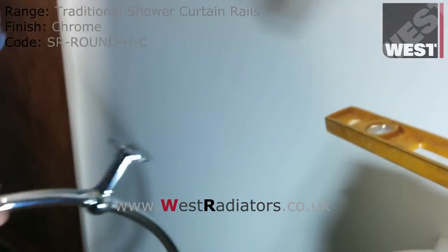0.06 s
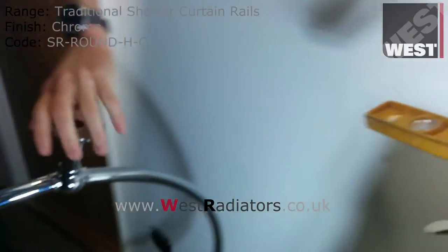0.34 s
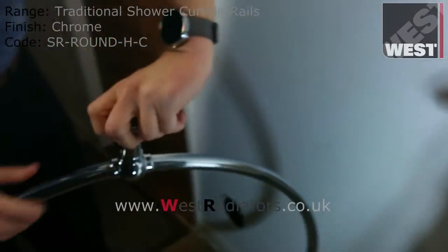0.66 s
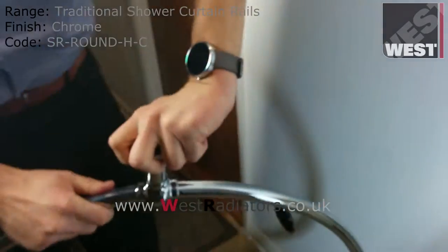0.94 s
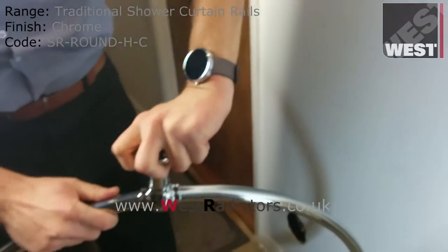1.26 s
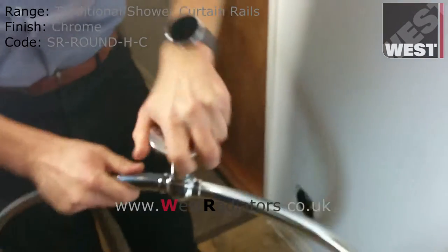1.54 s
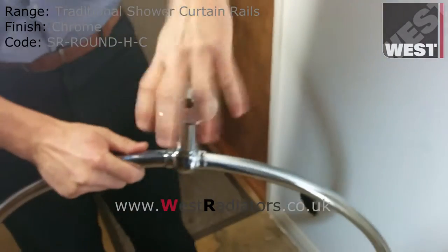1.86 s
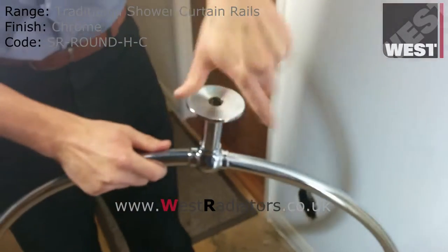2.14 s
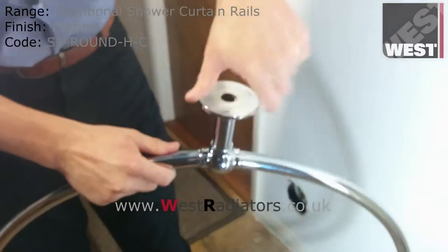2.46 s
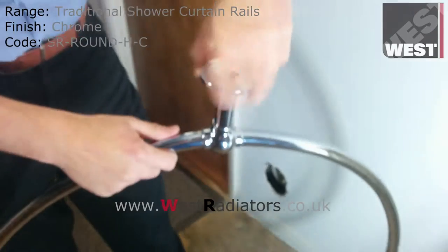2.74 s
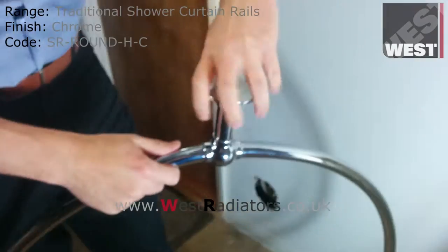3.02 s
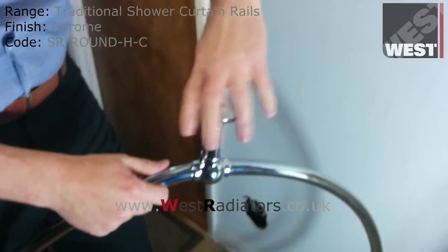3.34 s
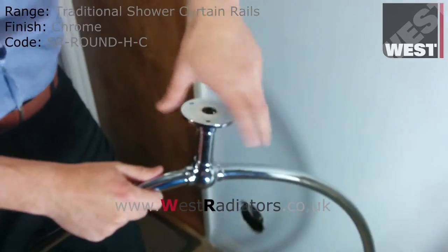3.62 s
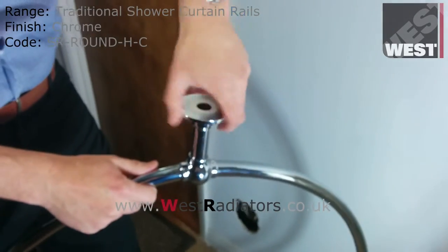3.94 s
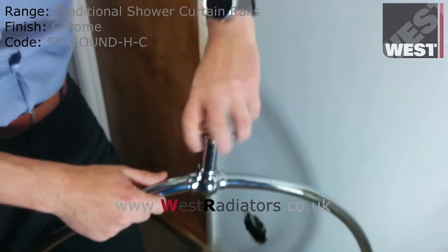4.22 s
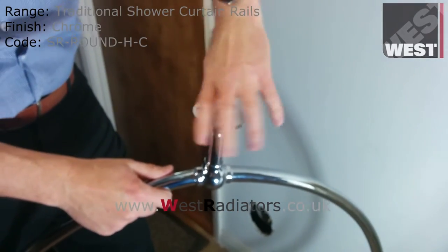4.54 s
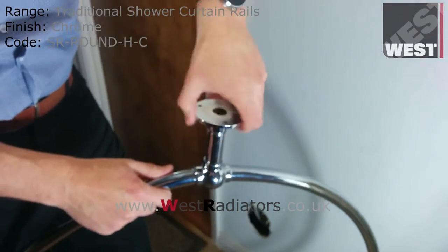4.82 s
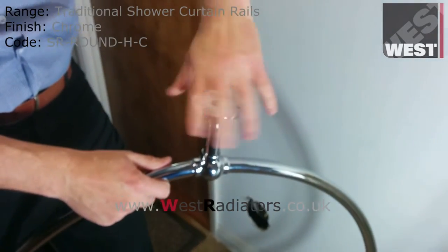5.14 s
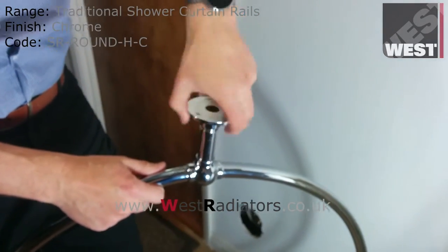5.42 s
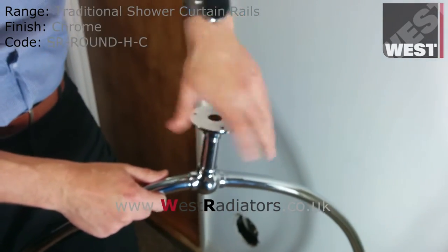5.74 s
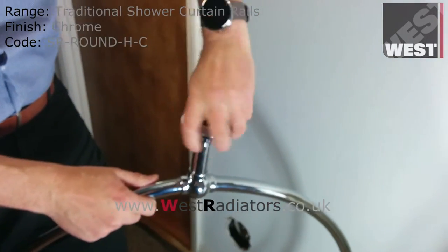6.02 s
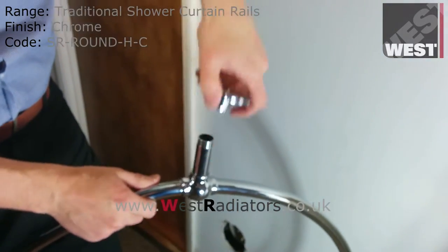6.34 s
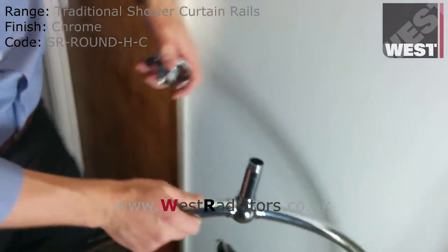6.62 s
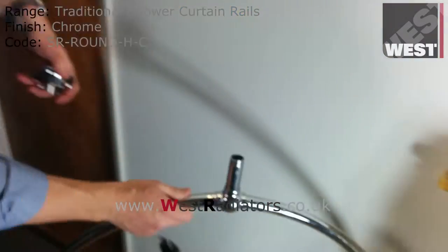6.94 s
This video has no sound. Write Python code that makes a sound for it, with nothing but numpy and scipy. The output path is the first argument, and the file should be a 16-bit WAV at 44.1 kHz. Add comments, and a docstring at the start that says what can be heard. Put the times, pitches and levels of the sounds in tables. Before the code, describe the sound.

A chrome plate is unscrewed by hand from the stem of a curtain rail, heard close in a small bathroom with a short echo and faint room tone. For the first second and a half, fingers rub over the metal, the rail bumps softly and a sleeve rustles faintly, with sharp little clicks around 1 and 1.2 seconds. At about 1.7 seconds the tight thread breaks free with a loud, brief, high squeal that rings on slightly. From 2 to 6 seconds come uneven turns of gritty, ringing metal scraping, with short squeaks and small hollow clunks. The strongest scrape and squeak falls near 2.9 seconds, and another bright catch with a click near 4.8. The turns then grow sparser and softer. At about 6.3 seconds the plate comes off with a light ping, followed by a soft, dull bump near 6.8 seconds.

```python
"""A chrome wall plate is unscrewed by hand from the stem of a curtain rail in a small bathroom.
The tight thread breaks free with a stick-slip squeal whose overtones linger. Each turn then scrapes,
clunks and squeaks, and the plate pings as it comes off. Fingers rub and click, the rail bumps softly,
a sleeve rustles over faint room tone. A noise suppressor cuts the room's tail short."""
import sys
import numpy as np
from scipy import signal
from scipy.fft import rfft, irfft, next_fast_len
from scipy.io import wavfile
from scipy.ndimage import uniform_filter1d, minimum_filter1d, map_coordinates

SR = 44100
rng = np.random.default_rng(int(sys.argv[2]) if len(sys.argv) > 2 else 0)


def inscribe(sig):
    """Save sig as 16-bit PCM at rate SR to the path in sys.argv[1].

    A 1-D sig is mono; a 2-D sig holds one channel per row.
    Samples are clipped to [-1, 1] before scaling.
    """
    pcm = np.round(np.clip(np.atleast_2d(sig).T, -1, 1) * 32767)
    wavfile.write(sys.argv[1], SR, pcm.astype(np.int16))


N = 311787
T = np.arange(N) / SR


def amp(db):
    """Decibels to gain."""
    return 10 ** (np.asarray(db) / 20)

def unit(x):
    """Scale to rms 1."""
    return x / np.sqrt(np.mean(x ** 2) + 1e-20)

def along(points, hz):
    """Interpolate (Hz, value) points on a log frequency axis."""
    knots_hz, values = np.transpose(points)
    return np.interp(np.log(hz + 1), np.log(knots_hz + 1), values)

def wobble(rate_hz):
    """Smooth random curve, rate_hz knots a second."""
    return map_coordinates(rng.standard_normal(int(N * rate_hz / SR) + 4), [T * rate_hz])

def filtered(x, response):
    """Apply a complex frequency response."""
    size = next_fast_len(N + SR // 2)
    return irfft(rfft(x, size) * response(np.fft.rfftfreq(size, 1 / SR)), size)[..., :N]

def coloured(x, spectrum):
    """Shape x by (Hz, dB) points, at rms 1."""
    return unit(filtered(x, lambda hz: amp(along(spectrum, hz))))

def noise(spectrum):
    """Coloured noise at rms 1."""
    return coloured(rng.standard_normal(N), spectrum)

def shifting(x, depth_db):
    """Favour different frequencies from moment to moment."""
    bins = signal.stft(x, nperseg=512)[2]
    field = uniform_filter1d(rng.standard_normal(bins.shape), size=3, axis=0)
    field = uniform_filter1d(field, size=7, axis=1)
    return signal.istft(bins * amp(depth_db * unit(field)), nperseg=512)[1][:N]

def strokes(rows, rise_s, t60_s):
    """Envelope of (start s, length s, dB) rows: each swells, holds and dies away."""
    lead = SR // 20
    t = np.arange(-lead, SR // 2) / SR
    power = np.zeros(N + SR)
    for start_s, length_s, db in rows:
        shape = (1 + np.tanh(t / rise_s)) / 2 * amp(db - 60 * np.maximum(t - length_s, 0) / t60_s)
        power[max(round(start_s * SR), 0):][:len(t)] += shape ** 2
    return np.sqrt(power[lead:][:N])

def resonances(rows, hz):
    """Summed response of (centre Hz, width Hz, dB) resonators."""
    return sum(amp(db) * 1j * hz * width / (centre ** 2 - hz ** 2 + 1j * hz * width)
               for centre, width, db in rows)

def ringing(rows, start_s, swell_s):
    """Sines of (Hz, dB, T60 s) rows that swell and decay."""
    t = np.maximum(T - start_s, 0)
    ring = sum(amp(db - 60 * t / t60_s) * np.sin(2 * np.pi * (hz * t + rng.random()))
               for hz, db, t60_s in rows)
    return (1 - np.exp(-t / swell_s)) * ring


# Room tone spectrum. Each row: frequency in Hz, relative level in dB.
ROOM_TONE_SPECTRUM = [(25, -12.5), (50, -7), (100, -14.5), (210, 0), (400, -0.5), (850, 4), (1300, -5),
                      (2500, -9), (5000, -15), (17000, -22.5)]

def room_tone(tone_db=-65, hum_hz=66.4, hum_db=-80):
    """Faint room noise and a wavering low hum."""
    hum = amp(3.2 * wobble(5.9)) * unit(np.sin(2 * np.pi * hum_hz * T + .4 * wobble(4.6)))
    air = unit(shifting(noise(ROOM_TONE_SPECTRUM), depth_db=3))
    return amp(tone_db) * air + amp(hum_db) * hum


# Wall reverberation. Each row: frequency in Hz, T60 in seconds.
ROOM_DECAY = [(150, 0.37), (600, 0.25), (2500, 0.28), (7000, 0.26), (14000, .26)]

def bathroom(x, wet_db, side_db=-21):
    """Hard walls add a short, nearly mono tail."""
    hz, t, bins = signal.stft(rng.standard_normal((2, SR // 2)), SR, nperseg=256)
    decay = amp(-60 * t / along(ROOM_DECAY, hz)[:, None])
    build_up = 1 - np.exp(-t / .004)
    tail = signal.istft(bins * decay * build_up, SR, nperseg=256)[1]
    tail /= np.linalg.norm(tail[0])
    mid, side = amp(wet_db) * signal.fftconvolve(x[None], tail, axes=1)[:, :N]
    return x + mid + amp(side_db) * np.array([side, -side])


# Rustle envelope. Each row: time in seconds, relative level in dB.
SLEEVE_LEVELS = [(0.0, -54.5), (0.196, -97), (0.436, -80), (0.638, -70), (0.91, -77.5), (1.02, -76),
                 (1.162, -67.5), (1.388, -80), (1.598, -63), (1.65, -51.5)]
# Cloth spectrum. Each row: frequency in Hz, relative level in dB.
CLOTH_SPECTRUM = [(1200, -20), (1800, -11), (2250, -10.5), (2550, 2), (2900, -11), (4200, -20),
                  (8200, -6.5), (12000, -14), (17000, -24.5)]

def sleeve(gain_db=7):
    """Cloth rustles while the hand takes hold."""
    level_db = np.interp(T, *np.transpose(SLEEVE_LEVELS), right=-120)
    return amp(level_db + gain_db) * noise(CLOTH_SPECTRUM)


# Rail knocks. Each row: start in seconds, relative level in dB.
RAIL_BUMPS = [(0.077, -62), (0.409, -45.5), (1.673, -49), (4.346, -60), (6.844, -45.5)]
# Knock spectrum. Each row: frequency in Hz, relative level in dB.
THUD_SPECTRUM = [(40, -14), (100, -10), (160, 0), (215, -3), (340, -5), (560, -18.5), (900, -22),
                 (2000, -44)]

def bumps():
    """Dull knocks of the hand-held rail."""
    level = strokes([(s, 0, db) for s, db in RAIL_BUMPS], rise_s=.0027, t60_s=.17)
    return level * noise(THUD_SPECTRUM)


# Finger slides. Each row: start in seconds, length in seconds, relative level in dB.
FINGER_SLIDES = [(.532, 0.026, -47), (.978, 0.03, -44.5), (1.198, 0.087, -48.5), (1.29, .13, -56),
                 (1.565, .07, -63.5), (1.653, .015, -43.5)]
# Spectra of skin on the face and on the rim. Each row: frequency in Hz, relative level in dB.
SKIN_SPECTRUM = [(200, -14), (800, -3.5), (2200, 3), (4200, -7.5), (8500, -1), (12000, -8), (16000, -13)]
RIM_SPECTRUM = [(1200, -25), (1800, -1), (2200, -16), (2560, 3), (3000, -21), (6000, -35)]

def fingers(drag_start_s=.77, drag_length_s=.26, drag_db=-62.5, grain_db=2):
    """Skin rubs over chrome and drags along the rim; the hand damps the metal."""
    slide = strokes(FINGER_SLIDES, rise_s=.008, t60_s=.082) * noise(SKIN_SPECTRUM)
    drag = strokes([(drag_start_s, drag_length_s, drag_db)], rise_s=.015, t60_s=.15)
    drag *= noise(RIM_SPECTRUM)
    return unit(amp(grain_db * wobble(200))) * (slide + drag)


# Clicks. Each row: start in seconds, relative level in dB, body offset in dB.
CLICK_HITS = [(0.513, -53.5, 16), (.997, -17, -16), (1.214, -27.5, -3.5), (1.241, -16.5, -6.5),
              (1.554, -32, -38), (4.876, -22.5, -4.5), (6.939, -59.5, 14.5), (6.988, -63.5, 14.5)]
# Spectra of a click's edge and body. Each row: frequency in Hz, relative level in dB.
EDGE_SPECTRUM = [(300, -22.5), (3000, -15.5), (6000, -1), (8500, 2), (12000, -6), (16000, -5)]
BODY_SPECTRUM = [(150, -34), (600, -6), (1200, -2.5), (2200, 1.5), (3500, -2), (7000, -26.5)]

def clicks(edge_db=-4, body_db=-5):
    """The grip and the loose thread tick: a bright edge, then a duller body."""
    edge = strokes([(s, 0, db + edge_db) for s, db, _ in CLICK_HITS], rise_s=.0005, t60_s=.017)
    body_rows = [(s, 0, db + offset_db + body_db) for s, db, offset_db in CLICK_HITS]
    body = strokes(body_rows, rise_s=.0011, t60_s=.089)
    return edge * noise(EDGE_SPECTRUM) + body * noise(BODY_SPECTRUM)


# Ping partials. Each row: frequency in Hz, relative level in dB, T60 in seconds.
PING_PARTIALS = [(2360, -41, .23), (6370, -56, .33)]

def ping():
    """Off the stem, the plate rings briefly on its own."""
    return ringing(PING_PARTIALS, start_s=6.288, swell_s=.004)


# Resonances of stem and rail, and of the tight plate-stem joint.
# Each row: centre in Hz, width in Hz, gain in dB.
RAIL_MODES = [(577.7, 38, 11.5), (860.7, 20, 4.5), (1116, 30.3, 7.5), (1328, 20, 3), (1475, 35, 6),
              (1563, 12, 14.5), (1827, 6.7, 5.5), (1853, 93, 5), (2050, 37, 1), (2203, 16, 10),
              (2310.5, 31, 10.5), (2653, 15, 5.5), (2976, 17, 11), (3610, 16, 6.5), (3773, 12, 8.5),
              (3998, 28, 17.5), (4436, 36, 15.5), (5002, 26, 10.5), (5504, 130, 8), (6330, 40, 7),
              (6820, 20, 5), (6890, 35, -5), (8500, 25, 8.5), (8770, 62, 11), (9600, 75, 3.5),
              (9826, 59, 6.5), (11730, 38, 12.5)]
JOINT_MODES = [(2905, 6, 16), (2955, 7, 13)]

def rail(x, loose_s=5, fade_s=.25):
    """Friction rings stem and rail; the joint's ring ends as the plate works loose."""
    tight = (1 - np.tanh((T - loose_s) / fade_s)) / 2
    joint = filtered(tight * x, lambda hz: resonances(JOINT_MODES, hz))
    return filtered(x, lambda hz: 1 + resonances(RAIL_MODES, hz)) + joint


# Hand turns, and catches where the thread jerks on.
# Each row: start in seconds, length in seconds, relative level in dB, treble offset in dB.
HAND_TURNS = [(1.836, 0.082, -30, -23.5), (2.158, 0.22, -38, -46), (2.335, 0.43, -32, -34.5),
              (2.874, 0.44, -33.5, -24.5), (3.495, 0.284, -32, -26), (3.85, 0.043, -44, -22.5),
              (3.965, .14, -37, -44), (4.411, 0.089, -45.5, -50.5), (4.735, 0.23, -36, -40),
              (5.884, 0.1, -41.5, -47.5), (6.18, 0.15, -42, -55)]
THREAD_CATCHES = [(2.16, 0.029, -28.5, -49.5), (2.285, .06, -35, -54), (2.36, 0.016, -30, -1.5),
                  (2.412, .01, -24, -22), (2.468, .03, -33, -22), (2.508, .035, -19.5, -8.5),
                  (2.687, 0.043, -28.5, -24), (2.906, 0.044, -11.5, 1.5), (3.175, 0.024, -19.5, -6.5),
                  (3.532, 0.027, -33, -6.5), (3.632, 0.031, -23, -17.5), (3.709, 0.023, -28.5, -4.5),
                  (4.034, 0.022, -22, -32), (4.462, 0.027, -32.5, -54), (4.735, 0.03, -25, -25.5),
                  (4.831, 0.012, -27.5, 6.5), (4.864, .028, -24, -28), (5.072, 0.0072, -38, -51.5),
                  (5.205, 0.012, -49, -39.5), (5.47, .026, -27, -35.5), (5.595, 0.0089, -40, -33),
                  (5.884, 0.0057, -28, -48), (5.927, 0.053, -33, -33), (6.128, .015, -43, -44),
                  (6.284, 0.019, -26, -35.5)]

def effort(pressure, treble_share):
    """Friction envelope of turns and catches, for a band taking a share of the treble offset."""
    turns, catches = ([(s, length_s, db + treble_share * treble_db) for s, length_s, db, treble_db in rows]
                      for rows in (HAND_TURNS, THREAD_CATCHES))
    turning = pressure * strokes(turns, rise_s=.0039, t60_s=.0549)
    return np.hypot(turning, strokes(catches, rise_s=.004, t60_s=.053))


# Hollow clunk spectrum. Each row: frequency in Hz, relative level in dB.
CLUNK_SPECTRUM = [(150, -18), (330, -5.5), (570, -0.5), (850, 10.5), (1150, -6), (2000, -37.5)]

def clunks(play_db=-39.5, play_db_per_s=4.5):
    """Growing play in the thread lets the plate knock against the stem at each catch."""
    knocks = [(s, length_s, db + play_db + play_db_per_s * s) for s, length_s, db, _ in THREAD_CATCHES]
    return strokes(knocks, rise_s=.0041, t60_s=.14) * noise(CLUNK_SPECTRUM)


# Friction bands, low to high. Each row: frequency in Hz, relative level in dB.
GRIND_SPECTRUM = [(100, -51.5), (300, -22), (550, -23), (850, -7), (1250, -2.5), (1600, 2), (2200, 3),
                  (2700, 1), (3200, -9), (4000, -39), (6000, -72.5)]
RASP_SPECTRUM = [(2000, -44), (3300, 4.5), (4100, 1.5), (5000, 1.5), (5900, -19.5), (7200, -7.5),
                 (10000, -65)]
SIZZLE_SPECTRUM = [(4000, -55), (5900, -9), (6900, 3.5), (8400, -9.5), (9700, -4.5), (11000, -12),
                   (13500, -20), (15500, -28)]

def scrapes(slips_per_s=1500, spread_db=4, grit=.84, judder_db=2, pressure_db=2.2, rasp_db=-3):
    """Tiny slips in the thread; the drier the contact, the more rasp and sizzle."""
    slips = (rng.random(N) < slips_per_s / SR) * amp(spread_db * rng.standard_normal(N))
    drive = shifting(unit(slips) + grit * rng.standard_normal(N), depth_db=3.6)  # contact point wanders
    judder = unit(amp(judder_db * (wobble(160) + wobble(55))))  # thread catches and lets go
    pressure = amp(pressure_db * wobble(28))  # the hand wavers
    grind = coloured(drive, GRIND_SPECTRUM) * effort(pressure, treble_share=0)
    rasp = coloured(drive, RASP_SPECTRUM) * effort(pressure, treble_share=.43)
    sizzle = coloured(drive, SIZZLE_SPECTRUM) * effort(pressure, treble_share=1)
    return judder * (grind + amp(rasp_db) * rasp + sizzle)


# Squeaks. Each row: start in seconds, length in seconds, pitch in Hz, relative level in dB.
THREAD_SQUEAKS = [(2.155, .014, 2004, -31.5), (2.91, .017, 1770, -14), (3.164, 0.03557, 1714, -25),
                  (3.489, .05, 1466, -30), (3.54, .035, 1650, -25), (3.651, 0.00923, 2165, -16.5),
                  (3.719, 0.037, 1580, -25.5), (3.855, .042, 1626, -36), (3.973, .039, 1700, -30.5),
                  (4.051, .009, 2080, -25), (4.202, 0.00728, 2164, -40), (4.41, 0.0098, 1860, -29),
                  (4.496, 0.041, 1800, -38.5), (4.833, 0.0166, 1799, -18), (4.871, 0.02433, 1575, -26.5),
                  (6.191, 0.094, 1788, -42)]
# How well the plate radiates a squeak. Each row: frequency in Hz, relative gain in dB.
PLATE_RADIATION = [(2400, 5.5), (3400, -8), (4600, 2.5), (5100, -15.5), (5900, -25.5)]

def squeaks(second_db=-21, third_db=-14, flutter_db=3.5, jitter=.07, wander=.03):
    """Slips lock briefly into a rough pitch; back-and-forth chatter favours the third partial."""
    knots = sorted((t, hz) for s, length_s, hz, _ in THREAD_SQUEAKS for t in (s, s + length_s))
    pitch_hz = np.interp(T, *np.transpose(knots)) * (1 + jitter * wobble(700) + wander * wobble(50))
    phase = 2 * np.pi * np.cumsum(pitch_hz) / SR
    tone = np.sin(phase) + amp(second_db) * np.sin(2 * phase) + amp(third_db) * np.sin(3 * phase)
    rows = [(s, length_s, db) for s, length_s, _, db in THREAD_SQUEAKS]
    level = strokes(rows, rise_s=.0082, t60_s=.024)
    return level * coloured(amp(flutter_db * wobble(300)) * tone, PLATE_RADIATION)


# Squeal overtones, clustered near multiples of 2.4 kHz.
# Each row: frequency in Hz, relative level in dB, T60 in seconds.
SQUEAL_RING = [(2250, -8.5, 0.11), (2230, -7.5, 0.35), (2425, 0, 0.14), (3050, -20.5, 0.73),
               (4325, -9.5, 0.18), (4780, -1, 0.2), (5200, -22.5, .42), (5060, -6, .19), (7000, -6.5, 0.16),
               (7690, 2.5, 0.22), (7278, -13.5, 0.5), (7350, 5.5, 0.22), (9440, -7, 0.28), (9500, -4, 0.11),
               (11700, -17, .3), (11800, -17.5, .2), (13900, -15.5, .18), (14680, -14, .24)]

def squeal_ring():
    """The mounted plate rings on briefly at the squeal's overtones."""
    return ringing(SQUEAL_RING, start_s=1.667, swell_s=.0046)


# Squeal partials. Each row: harmonic number, relative level in dB.
SQUEAL_PARTIALS = [(1, 2.5), (2, -4), (3, 0), (4, -3.5), (5, -11), (6, -18.5)]
# Friction noise under the squeal. Each row: frequency in Hz, relative level in dB.
CHAFE_SPECTRUM = [(300, -29), (1600, -22.5), (2200, -4), (2850, 0.5), (3200, -11), (3700, -21)]

def squeal(start_s=1.674, hold_s=.0096, t60_s=.135, level_db=-4, chafe_db=-24,
           onset_hz=2444, sag_hz_per_s=1500, jitter=.011, flutter_db=2):
    """The tight thread breaks free in fast stick-slip; the pitch sags as the strain lets go."""
    pitch_hz = onset_hz - sag_hz_per_s * np.clip(T - start_s, -t60_s, t60_s)
    phase = 2 * np.pi * np.cumsum(pitch_hz * (1 + jitter * wobble(700))) / SR
    partials = sum(amp(db) * np.sin(k * phase) for k, db in SQUEAL_PARTIALS)
    tone = unit(amp(flutter_db * wobble(700)) * partials)
    level = strokes([(start_s, hold_s, level_db)], rise_s=.006, t60_s=t60_s)
    return level * (tone + amp(chafe_db) * noise(CHAFE_SPECTRUM))


def scene():
    """Thread and plate slightly to the right; handling and background centred."""
    friction = amp(-11) * rail(scrapes() + clunks()) + amp(-2) * squeaks()
    thread = bathroom(friction, wet_db=-5)
    breakaway = bathroom(squeal(), wet_db=1) + amp(-13.5) * squeal_ring()
    handling = bathroom(clicks() + fingers() + amp(3) * bumps(), wet_db=-12.5)
    pan = amp([[-.45], [.45]])
    return pan * (thread + breakaway + ping()) + handling + sleeve() + room_tone()

def suppressor(x, threshold_db=-45, knee_db=6, depth_db=8, bass_hz=260):
    """Turn down all but the bass when the level sinks below the threshold."""
    power = np.abs(uniform_filter1d(np.mean(x ** 2, axis=0), size=700))
    closed = np.clip((threshold_db - 10 * np.log10(power + 1e-14)) / knee_db, 0, 1)
    bass = filtered(x, lambda hz: 1 / (1 + (hz / bass_hz) ** 4))
    return bass + (x - bass) * amp(-depth_db * uniform_filter1d(closed, size=400))

def limiter(x, ceiling=.9):
    """Ease the gain down just ahead of any peak over the ceiling."""
    gain = np.minimum(1, ceiling / (np.abs(x).max(axis=0) + 1e-9))
    return x * uniform_filter1d(minimum_filter1d(gain, size=300), size=300)

def record(dry):
    """Noise suppression, peak limiting, then a steep low-pass."""
    cutoff_hz = 15830
    return filtered(limiter(suppressor(dry)), lambda hz: 1 / (1 + (hz / cutoff_hz) ** 140))


dry = scene()
out = record(dry)
inscribe(out)
```